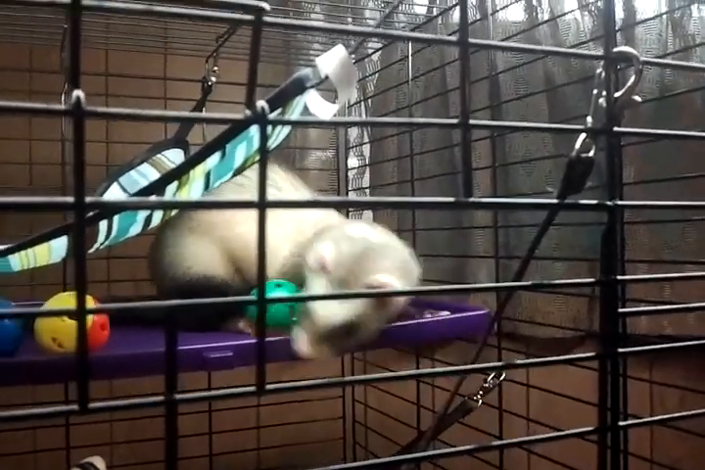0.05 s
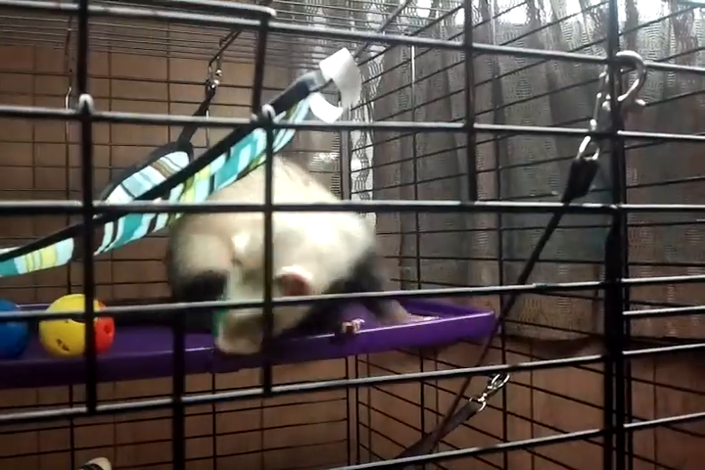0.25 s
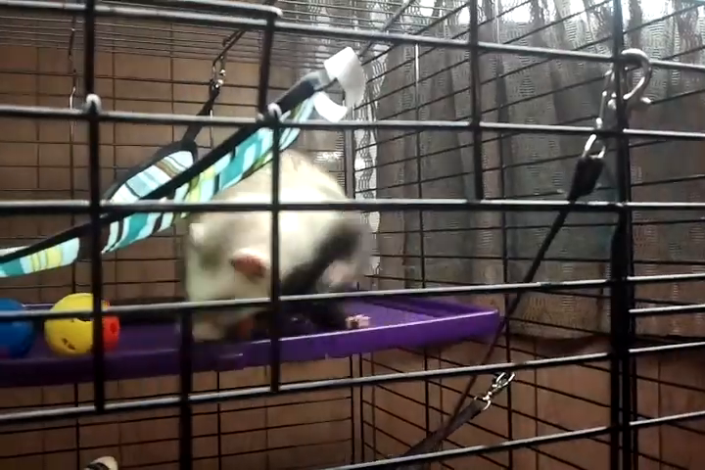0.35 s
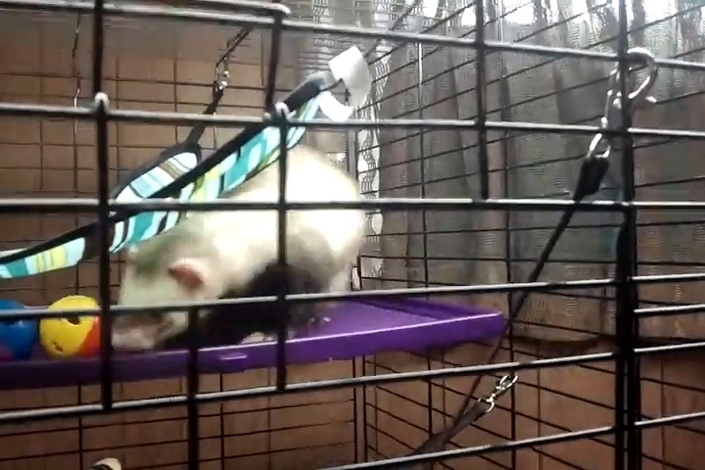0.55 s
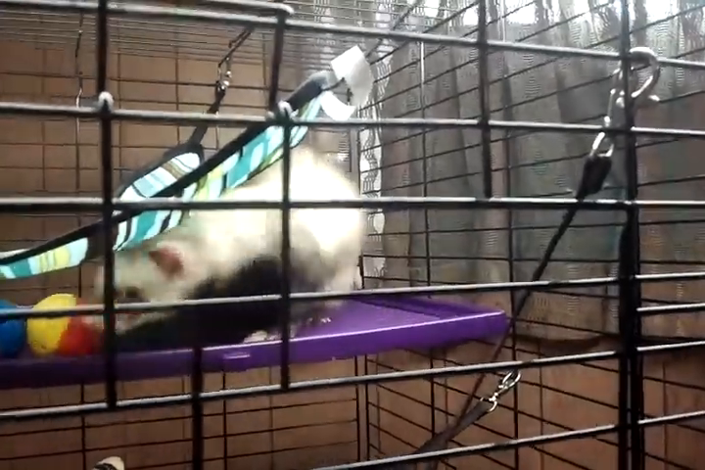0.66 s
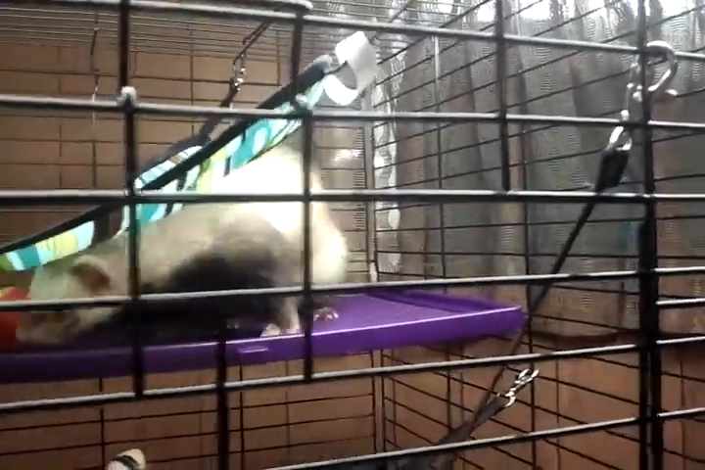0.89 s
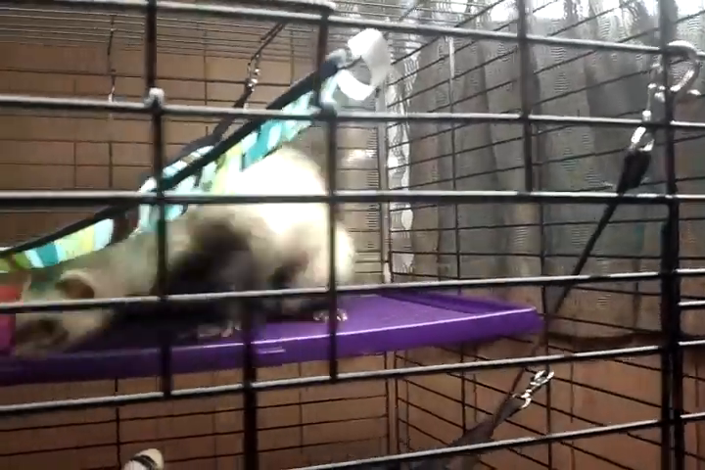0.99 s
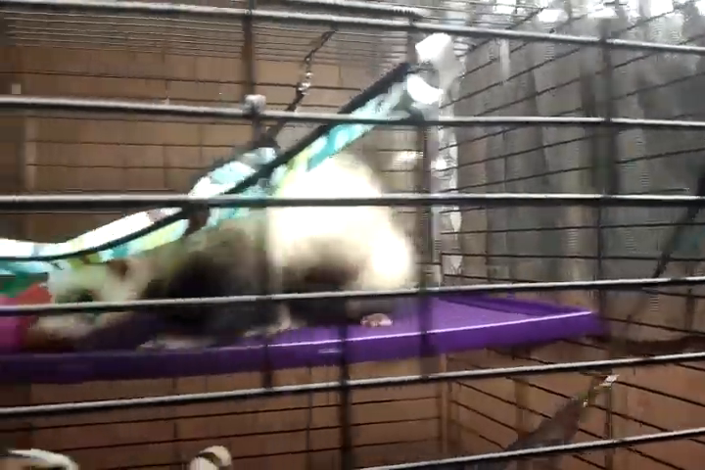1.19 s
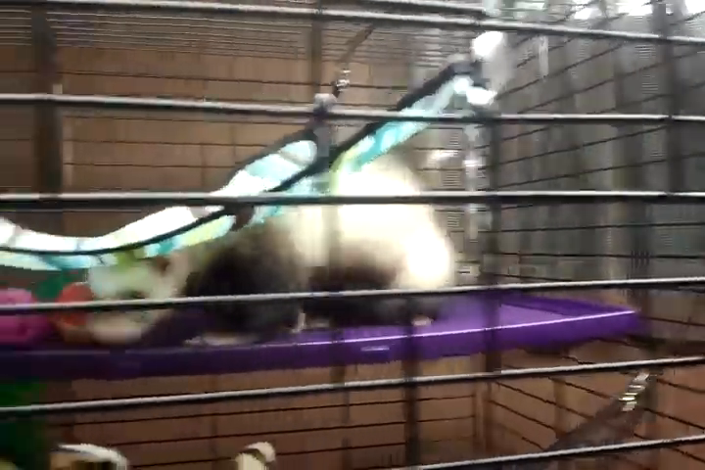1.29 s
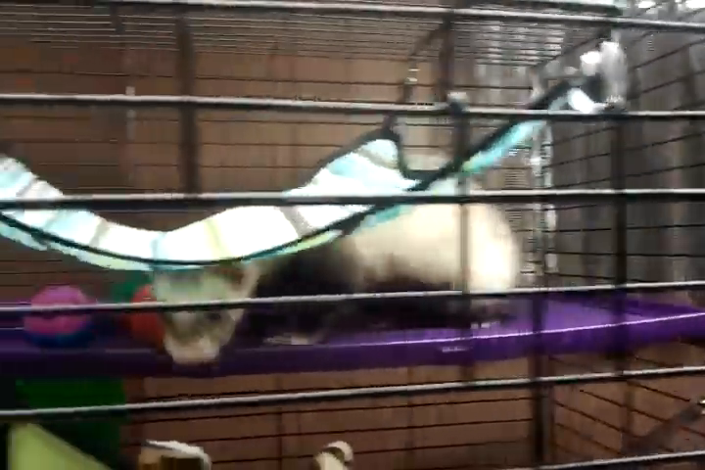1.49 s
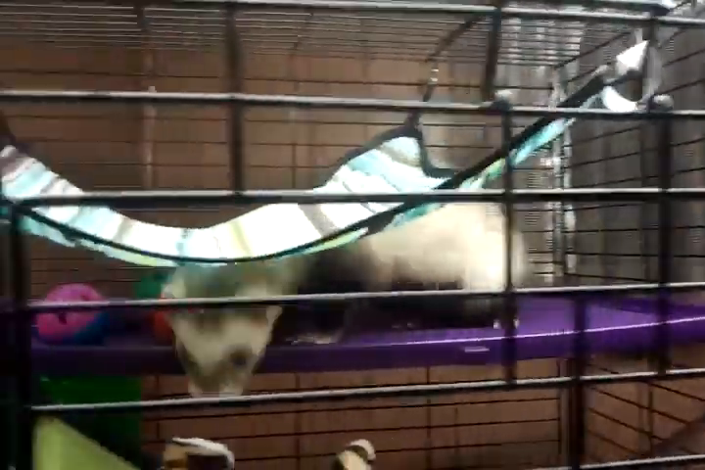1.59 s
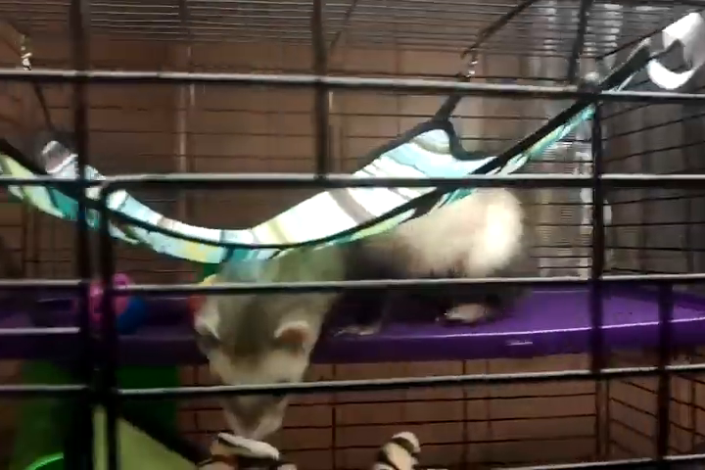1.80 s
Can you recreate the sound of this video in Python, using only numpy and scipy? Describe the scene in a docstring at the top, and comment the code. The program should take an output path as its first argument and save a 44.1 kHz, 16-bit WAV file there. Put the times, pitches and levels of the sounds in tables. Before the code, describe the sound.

Plastic jingle balls rattle and clack as a ferret pushes them around a wire cage.

```python
"""A small room, close to a wire cage: a ferret noses plastic jingle balls along the shelf.
Pellets roll and knock in the little bells, the plastic shells clack, and twice ball cracks on ball.
Paws scuffle and thump on the hollow shelf. Towards the end the cage wires and a hammock clip clink,
the shelf snaps against its frame and a farther ball rolls, all over soft room tone."""
import sys
import numpy as np
from scipy import signal
from scipy.fft import rfft, irfft
from scipy.io import wavfile

SR = 44100
rng = np.random.default_rng(int(sys.argv[2]) if len(sys.argv) > 2 else 0)


def log_audio(samples):
    """Write samples as a 16-bit WAV file to the path given in sys.argv[1]."""
    # one column per channel
    frames = np.atleast_2d(samples).T
    # limit to full scale, then quantise
    limited = np.clip(frames, -1, 1)
    pcm = np.round(limited * 32767).astype(np.int16)
    wavfile.write(sys.argv[1], SR, pcm)


N = 81585

# Tone colours. Each row: frequency in Hz, level in dB.
AIR_SPECTRUM = [(50, -8), (78, 12), (110, -1), (200, 10.5), (400, 7), (1000, -2.5), (2000, 4), (4000, -3.5),
                (7500, -4.5), (8700, -34.5)]  # room tone
SHELF_SPECTRUM = [(120, -34.5), (250, -16.5), (360, 0), (700, -3.5), (1150, -5.5), (1500, -11),
                  (2300, -15.5), (4500, -15.5)]  # dull knock on the shelf
FRAME_SPECTRUM = [(2200, -39), (3200, 0), (3700, 3.5), (4700, -25)]  # shelf snapping on its frame
PELLET_SPECTRUM = [(5600, -50.5), (6500, -1.5), (7300, 1), (8300, -27.5)]  # tick of a pellet
SHELL_SPECTRUM = [(200, -16), (800, -20.5), (2000, -11), (2900, -13), (3600, -1.5), (4600, -5), (6000, 3.5),
                  (8000, -6), (8800, -33)]  # clack of a plastic shell
CRACK_SPECTRUM = [(150, -34), (900, -26.5), (2400, -16.5), (3500, -11), (5000, -21.5), (6400, -3.5),
                  (7700, 15.5), (8700, -18)]  # ball against ball

# How each object rings. Each row: frequency in Hz, level in dB, time to fade 60 dB in seconds.
SHELF_MODES = [(365, -4, .07), (440, -4, .07), (520, -7, .05), (630, -4, .05), (685, 0, .07)]
WIRE_MODES = [(3735, 0, .065), (4372, -6, .04), (4550, 0, .05), (6720, -3, .035), (6900, -4, .03)]
HAMMOCK_CLIP_MODES = [(4900, 0, .045), (5080, -3, .035), (6250, -1, .04), (6520, -3, .04)]
FRAME_MODES = [(3951, 0, .07), (6620, 0, .07)]
BELL_MODES = [(4850, -17, .06), (5270, -19, .05), (5520, -13, .05), (5640, -10, .06), (6340, -7, .055),
              (6490, 0, .07), (6675, -2, .085), (7145, 0, .08), (7240, -4, .055), (7640, -4, .05),
              (7760, -3, .05), (8230, -9, .06), (8340, -14, .05)]
FAR_BELL_MODES = [(6480, -9, .05), (6720, -7, .05), (7340, -2, .08), (7420, 0, .12)]

# Fader curves for the textures. Each row: time in seconds, level in dB.
SCUFFLE_CURVE = [(0, -58.5), (0.301, -51.5), (0.581, -49.5), (.71, -42), (0.745, -40.5), (0.811, -43),
                 (0.919, -37), (1.05, -39), (1.086, -45.5), (1.125, -41.5), (1.19, -45.5), (1.3, -42),
                 (1.36, -44.5), (1.5, -46), (1.85, -54.5)]  # paws and balls moving over the shelf
ROLL_CURVE = [(.17, -56), (0.199, -42.5), (.29, -32), (.36, -41.5), (.4, -42), (.54, -36), (0.589, -29),
              (.615, -40), (0.666, -27.5), (.7, -37.5), (.775, -34.5), (0.838, -22), (.89, -27),
              (0.946, -22), (1.009, -30), (1.161, -27.5), (1.21, -27), (1.41, -29), (1.46, -37),
              (1.5, -46.5), (1.6, -52), (1.75, -48)]  # pellets rolling between jolts
FAR_ROLL_CURVE = [(1.5, -52), (1.64, -48), (1.72, -62), (1.81, -36), (1.85, -54)]  # the farther ball

# Spot hits. Each row: start in seconds, level in dB.
SHELF_KNOCKS = [(.370, -36.5), (.381, -44.5), (.624, -35), (.723, -30), (.737, -42), (.907, -37),
                (1.011, -33.5), (1.225, -34), (1.250, -30.5), (1.287, -25.5)]  # paws and balls
WIRE_CLINKS = [(1.105, -33), (1.297, -26.5), (1.338, -27.5), (1.365, -29.5), (1.418, -30), (1.455, -37),
               (1.495, -36), (1.541, -36), (1.580, -36.5)]
HAMMOCK_CLIP_TAPS = [(1.618, -31.5), (1.663, -38.5)]
BALL_CRACKS = [(0.5148, -8), (0.9364, -13)]

# Single-note hits. Each row: start in seconds, relative level in dB, pitch in Hz.
PAW_THUMPS = [(.636, -46, 109), (0.64, -37.5, 227), (0.67, -41.5, 244), (0.734, -47, 299),
              (1.017, -38, 1066), (1.118, -33, 454), (1.250, -29.5, 697), (1.287, -28, 668),
              (1.522, -45.5, 85.5)]  # one hollow note of the shelf
BELL_PINGS = [(.2516, -18.5, 6500), (.4736, -17, 8020), (.4936, -12, 8050), (.528, -14, 7060),
              (.5503, -10, 7200), (.843, -14.5, 6770), (.864, -13, 6615), (1.1124, -11, 7093),
              (1.343, -16.5, 7920), (1.5035, -21.5, 6760)]  # one clean note of a bell

# Jolts of the balls. Each row: start in seconds, bell level in dB, shell level in dB.
BALL_JOLTS = [(.181, -32.5, -45), (.205, -26.5, -40), (0.233, -26.5, -39.5), (.251, -28, -32.5),
              (.266, -27.5, -42), (.287, -31, -43.5), (0.3044, -20.5, -41), (0.33, -23.5, -48),
              (.346, -23, -39.5), (0.369, -25, -53), (.408, -32.5, -49), (.440, -27, -42),
              (.451, -24, -34.5), (0.473, -26.5, -36.5), (.4935, -27, -33), (0.52, -18.5, -28),
              (.578, -22, -49.5), (0.631, -24.5, -42), (0.652, -22.5, -31.5), (0.706, -32, -27.5),
              (.792, -27, -38.5), (.829, -22, -37.5), (0.843, -24, -43), (.863, -21, -25.5),
              (0.919, -20.5, -24.5), (0.928, -15.5, -34), (1.018, -23.5, -37), (1.047, -21, -35),
              (1.09, -21, -31.5), (1.113, -17.5, -28.5), (1.186, -17.5, -32), (1.229, -25.5, -34),
              (1.25, -16, -37), (1.285, -20, -21), (1.315, -15, -19), (1.371, -13.5, -22.5)]

HIT_S, SPOT_S = .25, .035  # length of a hit; time a rolling thing stays on one spot
KNOCK_RISE_S, JOLT_RISE_S, CRACK_RISE_S = .0032, .002, .0006
SHELL_T60, CRACK_T60 = .042, .013  # seconds to fade 60 dB


def amp(db):
    """Decibels to gain."""
    return 10 ** (np.asarray(db) / 20)


def unit(x):
    """Scales to rms 1."""
    return x / np.sqrt(np.mean(x ** 2) + 1e-20)


def unit_attack(x, size=220):
    """Scales a hit so that its first `size` samples have rms 1."""
    return x / np.sqrt(np.mean(x[:size] ** 2) + 1e-20)


def hit_time():
    """Time axis of one hit, in seconds."""
    return np.arange(int(HIT_S * SR)) / SR


def add(mix, start, sound):
    """Drops a sound into the mix at `start` seconds."""
    part = mix[max(round(start * SR), 0):][:len(sound)]
    part += sound[:len(part)]


def rise(seconds):
    """A linear attack: the blow builds over a short time."""
    return np.minimum((hit_time() + 1 / SR) / seconds, 1)


def tone(hz, t60):
    """One dying resonance."""
    t = hit_time()
    return amp(-60 * t / t60) * np.sin(2 * np.pi * hz * t)


def noise(spectrum, size):
    """Noise coloured by a spectrum, at rms 1."""
    points_hz, db = np.transpose(spectrum)
    hz = np.fft.rfftfreq(size, 1 / SR)
    eq = amp(np.interp(np.log(hz + 1), np.log(points_hz), db))
    return unit(irfft(rfft(rng.standard_normal(size)) * eq, size))


def clack(spectrum, t60, size=220):
    """A noise burst: a blow on something with dense, quickly dying modes."""
    t = hit_time()
    return unit_attack(noise(spectrum, len(t)) * amp(-60 * t / t60), size)


def ring(modes, detune=.004, scatter_db=4):
    """Ringing modes, weighted and detuned a little differently by each blow."""
    t = hit_time()
    hz, db, t60 = np.transpose(modes)[:, :, None]
    weight, drift, phase = rng.standard_normal((3, len(modes), 1))
    gains = amp(db + scatter_db * weight)
    partials = gains * amp(-60 * t / t60) * np.sin(2 * np.pi * (hz * (1 + detune * drift) * t + phase))
    return partials.sum(0) / np.sqrt(np.sum(gains ** 2) / 2)


def patter(make_hit, curve, per_s=600, spread_db=3, spots=18):
    """Tiny random hits riding a fader curve; their ring changes as the point of contact moves on."""
    t = np.arange(N) / SR
    fader = amp(np.interp(t, *np.transpose(curve), left=-np.inf))
    onsets = rng.random(N) < per_s / SR
    strengths = amp(spread_db * np.clip(rng.standard_normal(N), -2, 2))
    impacts = fader * unit(onsets * strengths)
    spot = (t / SPOT_S + rng.random(N)).astype(int) % spots
    out = np.zeros(N)
    for k in range(spots):
        hit = make_hit()
        out += signal.oaconvolve(impacts * (spot == k), hit / np.linalg.norm(hit))[:N]
    return out


def room_tone():
    """A soft, steady bed of air."""
    return amp(-55) * noise(AIR_SPECTRUM, N)


def reflections(x, t60=.19, per_s=2500, predelay_s=.004):
    """A short tail of sparse echoes off the nearby walls."""
    t = hit_time()
    echoes = rng.standard_normal(len(t)) * (rng.random(len(t)) < per_s / SR)
    tail = echoes * (t > predelay_s) * amp(-60 * t / t60)
    return signal.oaconvolve(x, tail / np.linalg.norm(tail))[:N]


def shelf_blow():
    """A dull knock that leaves the hollow shelf ringing."""
    knock = clack(SHELF_SPECTRUM, t60=.046, size=440)
    body = amp(-2.5) * ring(SHELF_MODES, detune=.018)
    return rise(KNOCK_RISE_S) * (knock + body)


def shelf():
    """The hollow plastic shelf under scuffles, knocks and soft footfalls."""
    out = patter(shelf_blow, SCUFFLE_CURVE, per_s=500, spread_db=2.5)
    for start, db in SHELF_KNOCKS:
        add(out, start, amp(db) * shelf_blow())
    for start, db, hz in PAW_THUMPS:
        add(out, start, amp(db) * 2 * rise(KNOCK_RISE_S) * tone(hz, t60=.044))
    return out


def cage():
    """Wires and a hammock clip clink, and the shelf snaps on its frame, as the ferret shifts its weight."""
    out = np.zeros(N)
    for hits, modes in (WIRE_CLINKS, WIRE_MODES), (HAMMOCK_CLIP_TAPS, HAMMOCK_CLIP_MODES):
        for start, db in hits:
            metal = ring(modes)
            tick = amp(-7) * clack(SHELL_SPECTRUM, SHELL_T60)
            add(out, start, amp(db) * unit_attack(metal + tick))
    snap = clack(FRAME_SPECTRUM, CRACK_T60) + amp(-2) * ring(FRAME_MODES)
    add(out, start=1.5205, sound=amp(-24.5) * rise(CRACK_RISE_S) * snap)
    return out


def jingle():
    """A pellet strikes its bell: a short, bright ring with a tick on the front."""
    return unit_attack(ring(BELL_MODES) + amp(-7) * clack(PELLET_SPECTRUM, t60=.012))


def shell_clack():
    """A bell knocks on the plastic shell around it."""
    return clack(SHELL_SPECTRUM, SHELL_T60)


def rolling_pellets():
    """Pellets tumble in their bells: a fine rattle close by, then the shimmer of a farther ball."""
    near = patter(lambda: jingle() + amp(-9.5) * shell_clack(), ROLL_CURVE)
    far = patter(lambda: ring(FAR_BELL_MODES), FAR_ROLL_CURVE)
    return near + far


def jingle_balls():
    """Over the rolling, jolts throw pellet at bell and bell at shell; pings and hard cracks cut through."""
    out = rolling_pellets()
    for start, bell_db, shell_db in BALL_JOLTS:
        jolt = amp(bell_db) * jingle() + amp(shell_db) * shell_clack()
        add(out, start, rise(JOLT_RISE_S) * jolt)
    for start, db, hz in BELL_PINGS:
        add(out, start, amp(db) * rise(JOLT_RISE_S) * tone(hz, t60=.029))
    for start, db in BALL_CRACKS:
        add(out, start, amp(db) * rise(CRACK_RISE_S) * clack(CRACK_SPECTRUM, CRACK_T60))
    return out


def scene():
    """The mono mix: balls, cage and shelf up front, a touch of room behind."""
    action = jingle_balls() + cage() + shelf()
    return (action + amp(-12) * reflections(action) + room_tone())[None]


def record(dry):
    """The loudest cracks overload softly, then a steep low-pass trims the top end."""
    ceiling, cutoff_hz = .62, 8800
    rounded = dry / (1 + (dry / ceiling) ** 4) ** .25
    lowpass = signal.firwin(221, cutoff_hz, window=("kaiser", 7), fs=SR)
    return signal.oaconvolve(rounded, lowpass[None], "same")


dry = scene()
out = record(dry)
log_audio(out)
```